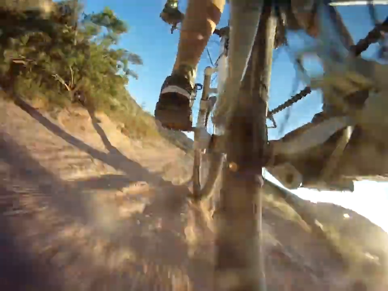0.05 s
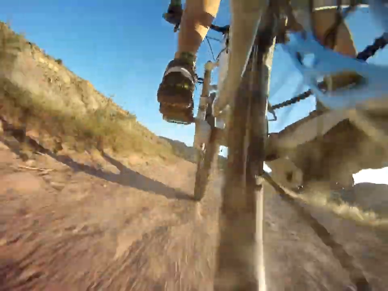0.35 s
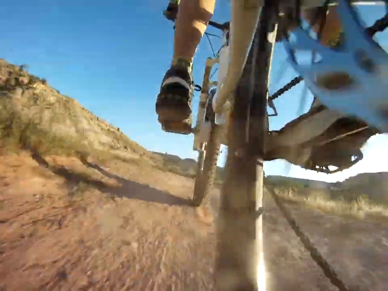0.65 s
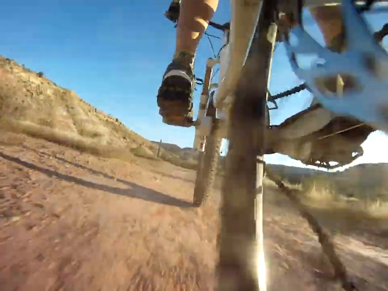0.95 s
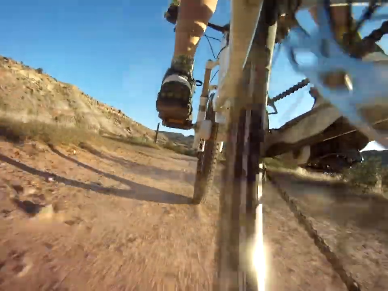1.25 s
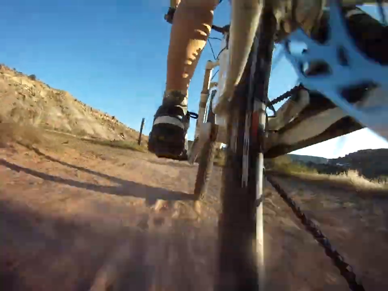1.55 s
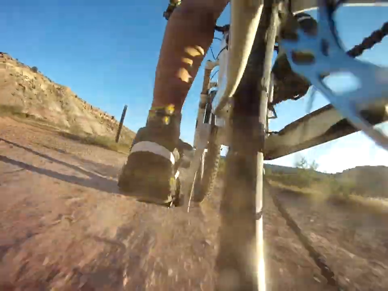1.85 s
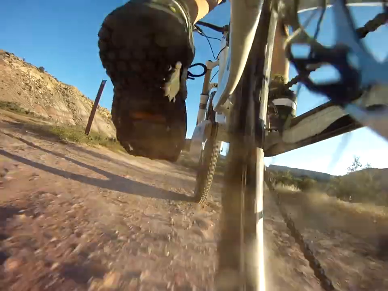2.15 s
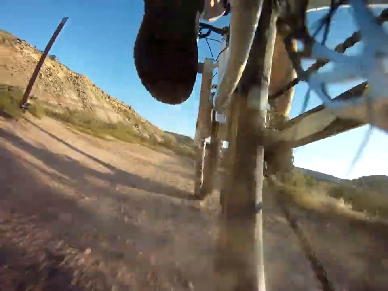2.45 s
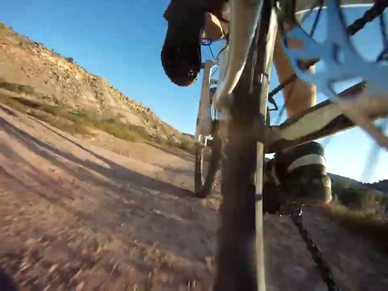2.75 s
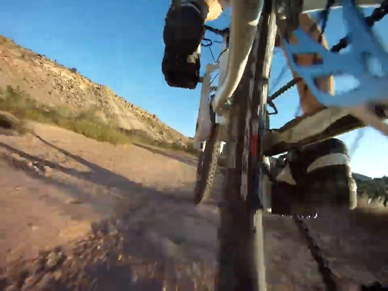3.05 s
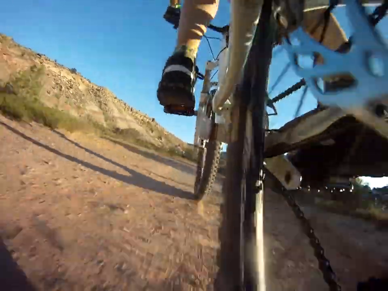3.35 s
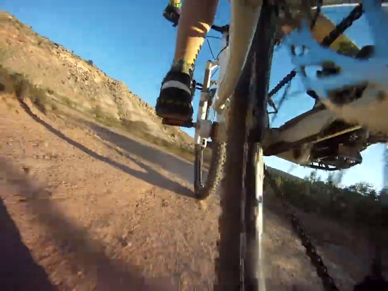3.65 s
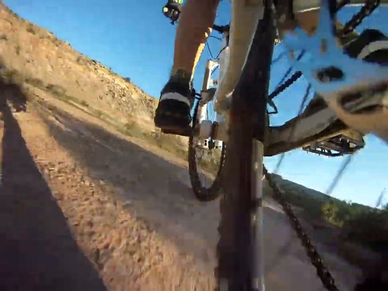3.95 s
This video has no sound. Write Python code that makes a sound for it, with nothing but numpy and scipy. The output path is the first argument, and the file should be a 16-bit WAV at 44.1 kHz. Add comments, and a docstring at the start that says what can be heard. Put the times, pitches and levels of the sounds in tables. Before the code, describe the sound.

A mountain bike rumbles and rattles over a dirt trail, heard very close.

```python
"""A dirt trail, heard point-blank from a small camera bolted to the frame of a rolling mountain bike.
The mount shakes, the tyres rumble and crunch, and the freewheel ticks until the chain takes up the
drive. Bumps make chain and frame clatter close to the microphone. The camera limits, overloads and
adds a gritty mirrored treble."""
import sys
import numpy as np
from scipy import signal
from scipy.fft import rfft, irfft
from scipy.io import wavfile
from scipy.ndimage import uniform_filter1d

SR = 44100
rng = np.random.default_rng(int(sys.argv[2]) if len(sys.argv) > 2 else 0)


def materialize(psi):
    """Save the field psi as 16-bit PCM at rate SR to the path in sys.argv[1].

    A 1-D psi becomes a single channel; in a 2-D psi each row is a channel.
    """
    bounded = np.clip(np.atleast_2d(psi).T, -1, 1)
    quanta = np.round(bounded * 32767).astype(np.int16)
    wavfile.write(sys.argv[1], SR, quanta)


N = 176400
T = np.arange(N) / SR


def amp(db):
    """Decibels to gain."""
    return 10 ** (np.asarray(db) / 20)


def unit(x):
    """Scales to an rms of 1."""
    return x / np.sqrt(np.mean(x ** 2) + 1e-20)


def peak_at(x, db):
    """Scales to a peak level in dB."""
    return amp(db) * x / abs(x).max()


def fader(rows):
    """Gain at every sample, gliding between rows of seconds and dB."""
    return amp(np.interp(T, *np.transpose(rows)))


def add(mix, start, sound):
    """Mixes a sound in at a start time in seconds."""
    part = mix[max(round(start * SR), 0):][:len(sound)]
    part += sound[:len(part)]


def colour(x, spectrum, size=4096):
    """Causal filter of unit energy with the given spectrum."""
    hz, db = np.transpose(spectrum)
    log_hz = np.log(abs(np.fft.fftfreq(size, 1 / SR)) + 1)
    log_gain = np.log(amp(np.interp(log_hz, np.log(hz), db)))
    taps = np.fft.ifft(np.exp(np.conj(signal.hilbert(log_gain)))).real[:size // 2]
    return signal.fftconvolve(x, taps / np.linalg.norm(taps))[:len(x)]


def burst(envelope, spectrum, size=4096):
    """Noise shaped by an envelope, then coloured."""
    return colour(rng.standard_normal(len(envelope)) * envelope, spectrum, size)


def resonate(x, hz, width_hz):
    """A steep resonance: two equal stages in series."""
    b, a = signal.iirpeak(hz, hz / width_hz, SR)
    return signal.lfilter(b, a, signal.lfilter(b, a, x))


def steadied(x, seconds):
    """Evens out swells slower than the given time, leaving an rms of 1."""
    power = uniform_filter1d(abs(signal.hilbert(x)) ** 2 / 2, max(int(seconds * SR), 1))
    return x / np.sqrt(abs(power) + 1e-12)


def ring(modes, t, pitch=1):
    """Struck metal: one dying sine for each mode."""
    return sum(amp(db - 60 * t / t60) * np.sin(2 * np.pi * hz * pitch * t) for hz, db, t60 in modes)


def ticks(runs, end):
    """Times and levels of evenly spaced ticks, each run lasting until the next."""
    stops = [row[0] for row in runs[1:]] + [end]
    return [(time, db) for (start, rate, db), stop in zip(runs, stops)
            for time in np.arange(start, stop - .5 / rate, 1 / rate)]


# The frame's hum under the camera. Each row: time in seconds, relative level in dB.
HUM_LEVEL = [(0.0, -32), (0.19, -34.5), (0.3, -24), (0.58, -26.5), (0.61, -14), (0.68, -27.5), (1.12, -27),
             (1.19, -39), (1.25, -23), (1.53, -17), (1.6, -40), (1.65, -22), (2.05, -28.5), (2.07, -15.5),
             (2.24, -29.5), (2.34, -18.5), (2.43, -15), (2.96, -33), (3.16, -27), (3.3, -34), (3.98, -36),
             (4.0, -51)]
# Its resonances. Each row: frequency in Hz, width of one stage in Hz, relative level in dB.
FRAME_MODES = [(329.5, 31, -0.5), (353.5, 30.5, 1)]


def frame_hum():
    """The rolling tyres excite the resonances of the frame."""
    road = rng.standard_normal(N)
    hum = sum(amp(db) * resonate(road, hz, width) for hz, width, db in FRAME_MODES)
    return amp(-1.24) * steadied(hum, seconds=0.1) * fader(HUM_LEVEL)


# Shaking right at the microphone. Each row: time in seconds, relative level in dB.
SHAKE_LEVEL = [(0.0, -26), (0.17, -20), (0.24, -36), (0.31, -20.5), (1.17, -18.5), (1.21, -25), (1.58, -18),
               (1.78, -23), (1.84, -27), (1.9, -19), (1.94, -29.5), (2.22, -12.5), (2.33, -26), (2.36, -15),
               (2.51, -21), (2.73, -18.5), (3.9, -22), (4.0, -17)]
# Its deep tone. Each row: frequency in Hz, relative level in dB.
SHAKE_SPECTRUM = [(8, -23.5), (20, -7), (25, 2), (28, 6), (33, 6), (40, -1.5), (55, -14), (90, -41.5),
                  (200, -64)]


def mount_shake():
    """The rough trail shakes the camera mount."""
    shake = colour(rng.standard_normal(N), SHAKE_SPECTRUM, size=32768)
    return amp(2.7) * steadied(shake, seconds=0.023) * fader(SHAKE_LEVEL)


# The tyres on the trail below. Each row: time in seconds, relative level in dB.
RUMBLE_LEVEL = [(0.0, -27), (0.01, -21.5), (0.1, -41), (0.15, -23.5), (0.2, -32.5), (0.51, -23.5),
                (0.53, -33), (0.63, -21.5), (0.69, -37), (0.78, -25.5), (1.08, -31.5), (1.11, -25),
                (1.21, -31), (1.43, -24), (2.02, -25.5), (2.41, -22.5), (2.44, -21), (2.7, -22.5),
                (3.11, -29.5), (3.13, -23.5), (3.84, -26.5), (4.0, -25)]
# Their dull tone. Each row: frequency in Hz, relative level in dB.
TYRE_SPECTRUM = [(25, -24), (50, -4.5), (75, 3), (100, -3), (175, -1.5), (220, -3.5), (265, -9.5),
                 (330, -7), (480, -24), (700, -18.5), (1500, -67)]


def tyre_rumble():
    """Uneven ground rumbles through the tyres."""
    rumble = colour(rng.standard_normal(N), TYRE_SPECTRUM, size=8192)
    return amp(1.27) * steadied(rumble, seconds=0.038) * fader(RUMBLE_LEVEL)


# Ruts passing under the wheels. Each row: start in seconds, peak level in dB.
RUTS = [(.018, -5), (0.149, -9), (0.611, -12), (1.11, -12.5), (2.335, -19), (2.856, -10), (3.145, -9),
        (3.777, -15)]


def ruts(decay_s=0.0046):
    """Each rut thumps through the tyres as a short dull push."""
    out, t = np.zeros(N), T[:SR // 10]
    for start, db in RUTS:
        add(out, start, peak_at(burst(np.exp(-t / decay_s), TYRE_SPECTRUM), db))
    return out


# Dirt crunching under the tread. Each row: time in seconds, level in dB.
CRUNCH_LEVEL = [(0, -34), (.2, -29.5), (.45, -29.5), (.7, -29.5), (1.2, -33.5), (1.42, -23.5), (1.6, -31.5),
                (1.87, -22.5), (2.05, -25), (2.35, -23), (2.6, -19), (2.72, -25.5), (2.85, -28),
                (2.94, -31.5), (3.25, -26), (3.42, -19), (3.58, -21), (3.74, -19), (3.8, -28.5),
                (3.9, -21.5), (4, -23.5)]
# Its tone, heard through the frame. Each row: frequency in Hz, relative level in dB.
CRUNCH_SPECTRUM = [(150, -19.5), (450, -18.5), (660, -7.5), (760, -8), (900, -2), (1130, 4), (1400, -3.5),
                   (1580, 2.5), (1800, -13), (2190, 4.5), (2450, -13.5), (2750, -8.5), (3000, -22),
                   (3750, -14), (4100, -23.5), (4350, -29.5), (5800, -32.5), (7000, -109)]


def dirt_crunch(grains_per_s=2500, spread_db=3, dust_db=-3, skip_db=1.5, skip_s=0.022):
    """Grit cracks over a wash of dust; the level swings quickly as the tread grips and skips."""
    grains = rng.standard_normal(N) * (rng.random(N) < grains_per_s / SR)
    grains *= amp(spread_db * np.minimum(rng.exponential(1, N), 3))
    dust = amp(dust_db) * rng.standard_normal(N)
    crunch = colour(unit(grains) + dust, CRUNCH_SPECTRUM)
    skip = unit(signal.oaconvolve(rng.standard_normal(N), np.hanning(round(skip_s * SR)), "same"))
    return steadied(crunch * amp(skip_db * skip), seconds=0.193) * fader(CRUNCH_LEVEL)


# Runs of clicks from the rear hub. Each row: start in seconds, clicks per second, peak level in dB.
FREEWHEEL_RUNS = [(.005, 55.3, -21), (.255, 58, -16.5), (.455, 66, -15.5), (.646, 69, -22),
                  (.871, 77, -23.5), (1.013, 63.4, -21.5), (1.304, 44.7, -15), (1.481, 36, -18),
                  (1.808, 29.4, -16.5), (1.943, 46, -17), (2.055, 40.2, -13.5), (2.442, 45, -20),
                  (2.652, 40, -13), (2.733, 58, -9.5), (2.88, 43.7, -19.5), (3.002, 35.4, -19.5),
                  (3.12, 46, -17)]
# The scrape of a pawl or a chain link. Each row: frequency in Hz, relative level in dB.
SCRAPE_SPECTRUM = [(300, -30), (800, -22.5), (1200, -3.5), (1700, -3), (2000, 10.5), (2230, 3), (2600, 2.5),
                   (3000, -16), (3400, -5), (3700, -13.5), (4050, -9.5), (4300, -20), (5800, -27),
                   (7000, -73)]


def freewheel(rise_s=0.0018, decay_s=0.0038, spread_db=1.5):
    """Pawls scrape and snap over the ratchet until the chain takes up the drive."""
    out, t = np.zeros(N), T[:1024]
    envelope = np.minimum(t / rise_s, 1) * np.exp(-t / decay_s)
    for start, db in ticks(FREEWHEEL_RUNS, end=DRIVE_RUNS[0][0]):
        snap = burst(envelope, SCRAPE_SPECTRUM, size=1024)
        add(out, start, peak_at(snap, rng.normal(db, spread_db)))
    return out


# A small steel part near the microphone. Each row: start in seconds, relative level in dB.
TINKLES = [(.015, -21), (.150, -27), (.332, -13.5), (0.403, -26), (.455, -19.5), (.581, -24),
           (0.732, -23.5), (.845, -26.5)]
# Its modes. Each row: frequency in Hz, relative level in dB, seconds to fall 60 dB.
STEEL_MODES = [(3320, -15.5, 0.045), (3396, 5, 0.025)]


def steel_tinkles(rise_s=0.0015):
    """A small steel part rings brightly and briefly."""
    out, t = np.zeros(N), T[:SR // 2]
    tinkle = ring(STEEL_MODES, t) * (1 - np.exp(-t / rise_s))
    for start, db in TINKLES:
        add(out, start, amp(db) * tinkle)
    return out


# Pings from the brake disc, down at the hub. Each row: start in seconds, relative level in dB.
DISC_PINGS = [(1.915, -60), (2.495, -19.5)]
# Its modes. Each row: frequency in Hz, relative level in dB, seconds to fall 60 dB.
DISC_MODES = [(845, 11.5, 0.16), (1950, -2, .12), (2579, 13, 0.21)]


def brake_disc():
    """A bump sets the brake disc ringing."""
    out = np.zeros(N)
    for start, db in DISC_PINGS:
        add(out, start, amp(db) * ring(DISC_MODES, T[:SR // 2]))
    return out


# Single chain clinks close by: slack ones, then the loudest links meeting the sprocket.
# Each row: start in seconds, level in dB.
CHAIN_CLINKS = [(.221, -16.5), (.333, -4), (.812, -14), (.871, -16), (.921, -8.5), (.949, -14.5),
                (1.040, -10.5), (1.089, -8.5), (1.126, -12), (1.159, -13), (2.752, -11), (2.833, -13.5),
                (2.902, -14.5), (3.002, -11.5), (3.180, -8), (3.312, -12.5), (3.332, -13), (3.478, -3.5),
                (3.559, -3.5), (3.611, -4.5), (3.724, -4), (3.925, -7)]
# Runs of links meeting the sprocket. Each row: start in seconds, links per second, level in dB.
DRIVE_RUNS = [(3.353, 38, -9.5), (3.479, 38.4, -8), (3.611, 35.2, -12), (3.81, 35.3, -13)]
# The modes of a link. Each row: frequency in Hz, relative level in dB, seconds to fall 60 dB.
LINK_MODES = [(1090, -10.5, 0.036), (1981, -1.5, 0.028), (2149, 11.5, 0.014), (2400, -7, 0.0066),
              (3970, -17, 0.019)]


def chain(rise_s=0.0015, detune=0.017, spread_db=1.2, rasp_db=-7.5, rasp_decay_s=0.0036):
    """Links clink unevenly when slack and evenly under load; each scrapes and has its own pitch."""
    out, t = np.zeros(N), T[:2048]
    # A run's link is skipped where a listed clink sounds.
    driven = [(start, rng.normal(db, spread_db)) for start, db in ticks(DRIVE_RUNS, end=T[-1] + .02)
              if min(abs(start - listed) for listed, _ in CHAIN_CLINKS) > .006]
    rise = 1 - np.exp(-(t / rise_s) ** 2)
    for start, db in CHAIN_CLINKS + driven:
        clink = rise * ring(LINK_MODES, t, pitch=rng.normal(1, detune))
        rasp = burst(rise * np.exp(-t / rasp_decay_s), SCRAPE_SPECTRUM, size=1024)
        add(out, start, peak_at(clink, db) + peak_at(rasp, db + rasp_db))
    return out


# The chain striking metal at close range. Each row: start in seconds, peak level in dB.
CHAIN_STRIKES = [(0.152, -4), (1.776, -3), (1.915, -6.5), (2.013, -2), (2.403, 2.5), (3.028, -17)]
# The tone of a strike. Each row: frequency in Hz, relative level in dB.
STRIKE_SPECTRUM = [(500, -35), (1500, 4.5), (2500, 18), (3200, -3), (4300, -8), (5500, -17.5),
                   (7000, -63.5)]


def chain_strikes(decay_s=0.0008):
    """Steel hits steel with a hard, sharp crack."""
    out, t = np.zeros(N), T[:1024]
    for start, db in CHAIN_STRIKES:
        crack = burst(np.exp(-t / decay_s), STRIKE_SPECTRUM, size=1024)
        add(out, start, peak_at(crack, db))
    return out


# Bumps rattling the chain and the frame that carries the microphone. Each row: start in seconds,
# level in dB, seconds before the decay, ring frequency in Hz, ring level over the rattle in dB.
BUMPS = [(.018, -18, 0.002, 1730, -13), (0.04, -17.5, 0.0017, 1130, -4), (0.076, -26, 0.002, 1050, 12),
         (0.1476, -8.5, 0.00067, 1860, -5), (0.286, -25, 0.0017, 1970, 1), (0.295, -14, 0.0035, 1060, -8),
         (.457, -23, 0.028, 1244, -18), (1.720, -10, 0.009, 1613, 4), (1.75, -17.5, 0.0051, 2217, 5),
         (1.772, -9, 0.014, 1636, -6), (1.869, -13, 0.013, 1073, -10), (1.91, -2, 0.0071, 1023, 3.5),
         (2.012, -1.5, 0.0025, 1933, -19), (2.078, -10.5, 0.0079, 1210, -9), (2.192, -12, 0.004, 1947, -7),
         (2.234, -15.5, 0.013, 2000, -7), (2.326, -15.5, 0.016, 1100, -9), (2.371, -9, 0.0067, 1614, -8),
         (2.39, -7.5, 0.0075, 1080, -9), (2.4019, 3, .003, 1140, 1), (2.475, -4, 0.01, 1180, -10),
         (2.494, -3.5, 0.024, 1380, -12), (2.58, -6, 0.0098, 1910, -6), (2.607, -10.5, 0.013, 1225, -14),
         (2.848, -19, 0.011, 1400, 0), (3.186, -18.5, .014, 1860, -21)]
# The tone of the rattle. Each row: frequency in Hz, relative level in dB.
RATTLE_SPECTRUM = [(150, -2), (350, 6), (520, -8), (680, -6), (1000, 6.5), (1350, 5.5), (1600, 2),
                   (2250, 3.5), (2650, -14.5), (3000, -40), (3500, -8), (4300, -23.5), (5800, -39),
                   (7000, -58)]


def clatter(rise_s=0.00059, decay_s=0.0044):
    """Each bump is a tight flurry of contacts that rings one part of the frame."""
    out, t = np.zeros(N), T[:SR // 10]
    for start, db, hold_s, hz, ring_db in BUMPS:
        envelope = np.minimum(t / rise_s, 1) * np.exp(-np.maximum(t - hold_s, 0) / decay_s)
        rattle = unit(burst(envelope, RATTLE_SPECTRUM))
        frame_ring = unit(envelope * np.sin(2 * np.pi * hz * t))
        knock = unit(rattle + amp(ring_db) * frame_ring)
        add(out, start, amp(db) * knock * np.sqrt(np.mean(envelope ** 2)))
    return out


def rolling():
    """The steady bed of the ride: shake, rumble, hum, grit and ticking."""
    return mount_shake() + tyre_rumble() + frame_hum() + dirt_crunch() + freewheel()


def scene(side_db=-28.5):
    """Nearly mono at the camera: only a trace of the rolling sound differs between the sides."""
    bike = rolling() + ruts() + steel_tinkles() + brake_disc() + chain() + chain_strikes() + clatter()
    side = amp(side_db) * rolling()
    return np.array([bike + side, bike - side])


def sample_hold(x, rate_hz=12000):
    """Holding samples at a low rate mirrors the sound into the treble, on both sides of that rate."""
    spectrum = rfft(x) * (np.fft.rfftfreq(N, 1 / SR) < rate_hz / 2)
    rate_bin = round(rate_hz * N / SR)
    bins = np.arange(1, rate_bin // 2)
    below, above = rate_bin - bins, rate_bin + bins
    spectrum[:, below] -= amp(0.52) * np.conj(spectrum[:, bins]) * bins / below
    spectrum[:, above] += amp(1.2) * spectrum[:, bins] * bins / above
    return irfft(spectrum, N)


def limiter(x, threshold_db=-4, attack_s=0.006, recover_db_per_s=33.5):
    """Loud peaks duck the camera's gain, which then climbs back steadily."""
    over_db = np.maximum(20 * np.log10(abs(x).max(0) + 1e-9) - threshold_db, 0)
    recovery_db = T * recover_db_per_s
    target_db = np.maximum.accumulate(over_db + recovery_db) - recovery_db
    pole = np.exp(-1 / (attack_s * SR))
    duck_db = signal.lfilter([1 - pole], [1, -pole], target_db)
    return x * amp(-duck_db)


def record(dry, ceiling=0.97, cutoff_hz=15200):
    """The camera mirrors the treble, limits, clips the peaks that slip through and cuts the top."""
    clipped = np.clip(limiter(sample_hold(dry)), -ceiling, ceiling)
    lowpass = signal.firwin(201, cutoff_hz, window=("kaiser", 8), fs=SR)
    return signal.oaconvolve(clipped, lowpass[None], "same")


dry = scene()
out = record(dry)
materialize(out)
```